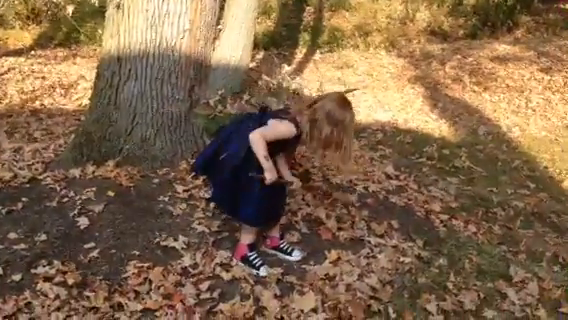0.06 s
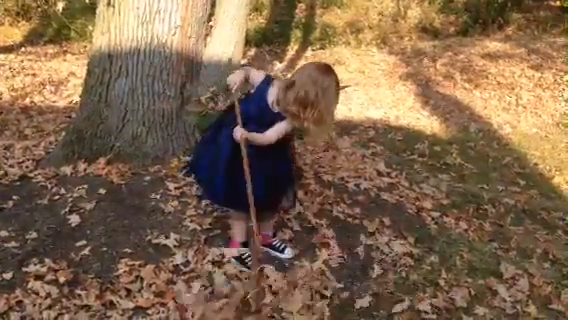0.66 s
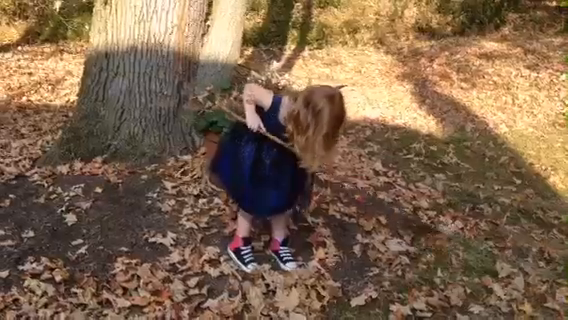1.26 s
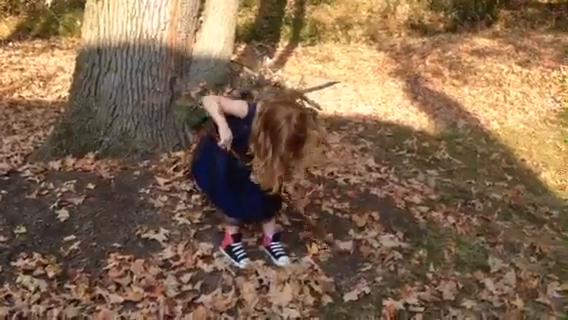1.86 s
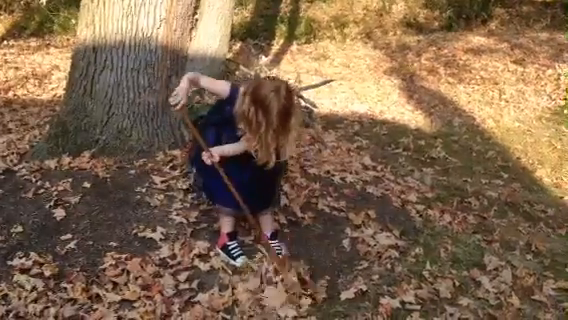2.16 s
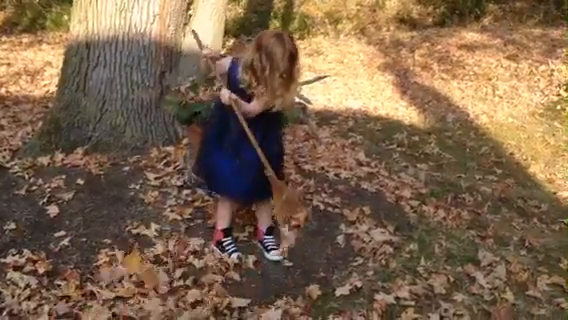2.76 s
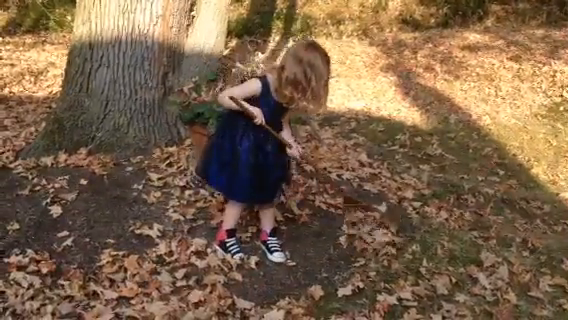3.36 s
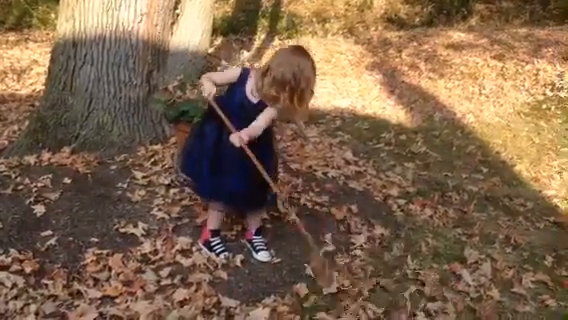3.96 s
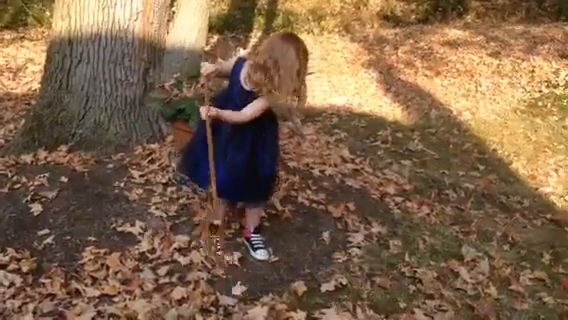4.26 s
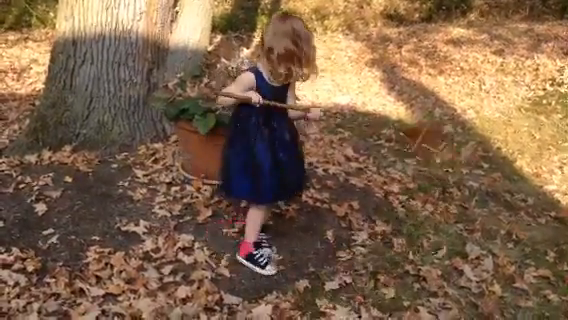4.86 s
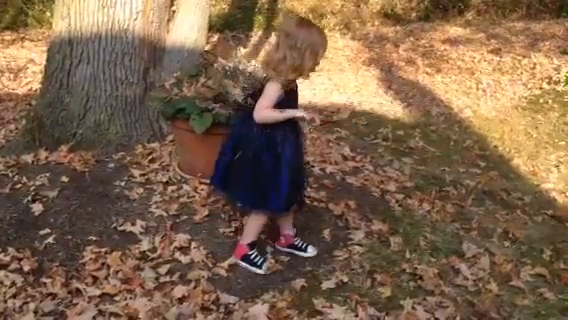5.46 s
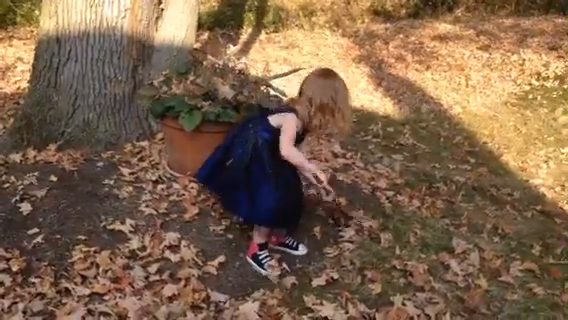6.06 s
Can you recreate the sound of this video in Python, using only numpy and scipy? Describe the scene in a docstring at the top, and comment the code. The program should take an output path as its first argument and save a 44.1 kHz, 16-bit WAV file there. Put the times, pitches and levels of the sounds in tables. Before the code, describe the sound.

In a quiet garden, a small rake is dragged through dry fallen leaves close to the microphone. Three long pulls each begin as a gritty scrape of tines and loosen into a crackling rustle. Twigs snap sharply along the way. The strokes then shrink to short scuffs and flicks, with a few soft knocks and one last rustle. A distant machine hums faintly under light outdoor noise and insects.

```python
"""In a garden, a child drags a small rake through dry leaves: three long pulls, then short scuffs.
Stick-slip friction excites the resonances of the digging tines; as the rake swings round and skims
on, the scrape gives way to loose leaves, whose many tiny fractures merge into a crackle.
Twigs snap, and shoes, rake head and handle knock, each an impulse with a damped ring.
A distant garden machine hums in wavering partials over faint outdoor noise and insects."""
import sys
import numpy as np
from scipy import signal
from scipy.fft import rfft, irfft
from scipy.io import wavfile
from scipy.ndimage import uniform_filter1d, map_coordinates

SR = 44100
rng = np.random.default_rng(int(sys.argv[2]) if len(sys.argv) > 2 else 0)


def put_to_file(sound):
    """Save the sound as 16-bit audio at rate SR, in the file named by the first command-line argument."""
    columns = np.atleast_2d(sound).T  # one column per channel
    safe = np.clip(columns, -1, 1)
    whole_steps = np.round(safe * 32767)
    wavfile.write(sys.argv[1], SR, whole_steps.astype(np.int16))


N = 269010


def undb(db):
    """Decibels to amplitude ratio."""
    return 10 ** (np.asarray(db) / 20)


def unit(x):
    """Normalisation to rms 1."""
    return x / np.sqrt(np.mean(x ** 2))


def walk(per_s):
    """Slow random modulation: random steps, smoothed twice, at rms 1."""
    hold = max(int(SR / per_s), 2)
    steps = np.repeat(rng.standard_normal(N // hold + 1), hold)
    return unit(uniform_filter1d(uniform_filter1d(steps, hold), hold)[:N])


def ring(x, hz, width_hz):
    """Second-order resonance with gain 1 at its centre."""
    return signal.lfilter(*signal.iirpeak(min(hz, SR / 2 - 1000), hz / width_hz, fs=SR), x)


def band(x, lo_hz, hi_hz, order):
    """Band-pass filtering."""
    return signal.sosfilt(signal.butter(order, [lo_hz, hi_hz], "band", fs=SR, output="sos"), x)


def colour(x, spectrum, size=4096):
    """Minimum-phase filtering to a given spectrum, so that clicks keep their sharp front."""
    hz, db = np.transpose(spectrum)
    gain = undb(np.interp(np.log(np.fft.rfftfreq(size, 1 / SR) + 1), np.log(hz), db))
    cepstrum = irfft(np.log(gain))
    cepstrum[1:size // 2] *= 2
    cepstrum[size // 2 + 1:] = 0
    return signal.fftconvolve(x, irfft(np.exp(rfft(cepstrum))))[:N]


# Spectrum of the outdoor background: frequency_hz, gain_db
AIR_SPECTRUM = [(30, -15), (72, -31), (95, -7.5), (150, -2), (260, 0.5), (420, -5.5), (900, -8),
                (1500, -12), (2700, -19.5), (4600, -16), (5800, -31.5), (8000, -37), (9300, -41),
                (15000, -31)]

def outdoor_air():
    """Broadband noise, strongest in the bass, with slight amplitude modulation."""
    return unit(colour(rng.standard_normal(N), AIR_SPECTRUM)) * undb(-55.5 + 0.69 * walk(5.1))


def insects():
    """Narrow-band noise: a far chorus, and one nearer insect modulated into about 14 chirps a second."""
    chorus = unit(ring(ring(rng.standard_normal(N), 7360, 900), 7360, 900)) * undb(-66 + walk(16))
    chirp_phase = 2 * np.pi * np.cumsum(14 * (1 + 0.21 * walk(8.4))) / SR
    chirps = np.maximum(np.sin(chirp_phase), 0) * undb(2 * walk(11))
    carrier = ring(ring(rng.standard_normal(N), 7450, 260), 7450, 260)
    return chorus + unit(carrier * chirps) * undb(-71)


# Partials of the motor, before the swell: pitch_hz, level_db, waver_fraction
MOTOR_PARTIALS = [(92, -77, 0.0083), (107.2, -72, 0.0056), (121, -76, 0.0036), (134, -66.5, 0.01),
                  (155.6, -76, 0.0137), (183.6, -55, 0.004), (214.5, -69, 0.0116), (277.4, -72.5, 0.01494),
                  (982, -72.5, 0.00796)]
# Swell of the whole hum: time_s, gain_db
MOTOR_SWELL = [(0, 0), (.5, -5), (1.4, -.5), (2.1, -1.5), (2.4, 2.5), (3.3, 1.5), (4.6, -1), (6.1, -3)]

def machine():
    """Superposition of a far motor's partials, which waver in pitch and fade in and out on the way."""
    hum = np.zeros(N)
    for pitch_hz, level_db, waver in MOTOR_PARTIALS:
        amplitude = np.sqrt(2) * undb(level_db + 0.5 * walk(4.9))
        phase = 2 * np.pi * np.cumsum(pitch_hz * (1 + waver * walk(10))) / SR
        hum += amplitude * np.sin(phase)
    return hum * undb(np.interp(np.arange(N) / SR, *np.transpose(MOTOR_SWELL)))


def crackle(per_s, spread_db, colour_db, scatter_db, scatter_s, bands=12):
    """Shot noise of breaking leaf edges: each click has its own colour and scatters through the litter."""
    strength = undb(spread_db * np.minimum(rng.exponential(size=N), 5.5))
    clicks = (rng.random(N) < per_s / SR) * strength * rng.choice([-1, 1], N)
    edges_hz = np.linspace(0, 1, bands + 1) ** 1.5 * 16000 + 150
    grains = np.zeros(N)
    for k in range(bands):
        weighted = clicks * undb(colour_db * rng.uniform(-0.69, 1, N))
        grains += band(weighted, edges_hz[k], edges_hz[k + 1], order=2) * (-1) ** k
    grains = unit(grains)
    energy = signal.lfilter([1], [1, -np.exp(-1 / (scatter_s * SR))], grains ** 2)
    scatter = unit(np.sqrt(energy) * rng.standard_normal(N))
    return unit(grains + undb(scatter_db) * scatter)


# Spectrum of contact with the ground, for shoes and tines alike: frequency_hz, gain_db
GROUND_SPECTRUM = [(150, -10), (450, -13), (720, -3.5), (1050, -12.5), (1450, -8.5), (2450, -4.5),
                   (2850, -6.5), (3400, -17), (3750, -5), (6200, -0.5), (7700, -11), (9400, -12),
                   (12300, -16.5), (14600, -15)]

def underfoot():
    """Sparse shot noise: leaves tick faintly under the shoes."""
    ticks = crackle(per_s=140, spread_db=2.5, colour_db=4, scatter_db=2, scatter_s=0.01, bands=5)
    return unit(colour(ticks, GROUND_SPECTRUM)) * undb(-71)


# Resonances of the tines: pitch_hz, width_hz, gain_db
TINE_MODES = [(3720, 270, 7), (4320, 150, 0.5), (4600, 140, -3), (4795, 71, -1)]

def tine_scrape():
    """Stick-slip friction drives resonances; each tine grips and lets go in its own time."""
    grit = crackle(per_s=4500, spread_db=2, colour_db=9.5, scatter_db=-3.5, scatter_s=0.0046)
    grit = colour(grit, GROUND_SPECTRUM)
    return grit + sum(undb(db + 3.1 * walk(35)) * ring(grit, hz, width) for hz, width, db in TINE_MODES)


# Spectrum of loose leaves: frequency_hz, gain_db
LEAF_SPECTRUM = [(150, -26), (500, -17), (800, -5.5), (1250, -11.5), (1900, 0.5), (2800, -1), (3900, -4.5),
                 (4750, -2.5), (5400, -8.5), (6700, 2), (8300, -6.5), (10200, -14), (11900, -14),
                 (14500, -14.5)]

def loose_leaves():
    """Dense shot noise of stirred leaves, with one resonance in the treble."""
    grains = crackle(per_s=3000, spread_db=3, colour_db=10.5, scatter_db=1, scatter_s=0.015)
    leaves = colour(grains, LEAF_SPECTRUM)
    return leaves + undb(-1) * ring(leaves, hz=4710, width_hz=200)


def stray_leaves(rustle_gain, relative_db=-18.5, lag_s=0.071):
    """Relaxation: single leaves crack in the wake of the rake, their level lagging the rustle."""
    cracks = crackle(per_s=130, spread_db=3.5, colour_db=7, scatter_db=-5, scatter_s=0.0034, bands=5)
    pole = np.exp(-1 / (lag_s * SR))
    wake = signal.lfilter([1 - pole], [1, -pole], rustle_gain)
    return unit(colour(cracks, LEAF_SPECTRUM)) * undb(relative_db) * wake


def contact_envelope(start_s, rise_s, hold_s, fade_db_per_s, settle_db=-15, settle_db_per_s=55):
    """Double-slope decay: after a rise and a hold the rustle fades, then the last leaves settle slowly."""
    t = np.arange(N) / SR - start_s
    rise = np.clip(t / rise_s, 0, 1) ** 1.17
    after_s = np.maximum(t - rise_s - hold_s, 0)
    return rise * undb(np.maximum(-fade_db_per_s * after_s, settle_db - settle_db_per_s * after_s))


# In these four tables level_db sets the rustle's middle band; body_db is its low band relative to that.
# The rake is set down: start_s, rise_s, hold_s, level_db, body_db
RAKE_LANDINGS = [(0.149, 0.029, 0.01, -35.5, -5), (1.683, 0.0074, .04, -41, -5.5),
                 (3.64, 0.067, 0.011, -34, -8.5), (4.547, 0.038, 0.0098, -40.5, -6.5),
                 (5.851, 0.037, 0.0062, -50.5, -5), (5.984, 0.1, .025, -40.5, -6.5)]
# Long pulls with the tines digging: start_s, rise_s, hold_s, level_db, body_db
RAKE_PULLS = [(0.206, 0.12, 0.18, -34.5, -6.5), (1.889, 0.23, .28, -37, -6), (3.688, 0.1, 0.061, -36.5, -9)]
# The rake skims and shoves loose leaves along: start_s, rise_s, hold_s, level_db, body_db
RAKE_SKIMS = [(.63, 0.083, 0.12, -45, -5.5), (.86, .08, 0.15, -43, -3), (2.56, 0.037, 0.14, -43, -4),
              (2.8, 0.063, 0.26, -48.5, -5), (4.0, 0.072, 0.19, -54.5, -6.5), (4.7, 0.053, 0.1, -58, -10),
              (5.8, 0.076, 0.11, -61, -10)]
# Tufts of leaves catch and flip: start_s, level_db
TUFT_FLICKS = [(1.085, -42), (1.21, -47.5), (1.355, -57.5), (1.805, -49), (2.69, -51), (3.105, -49.5),
               (3.203, -46.5), (3.3, -58), (3.397, -59), (4.163, -49), (4.265, -51.5), (4.42, -58.5),
               (4.52, -51.5), (4.62, -48.5), (4.865, -53.5)]

def stirring(flick_rise_s=0.01, flick_hold_s=0.0067, flick_body_db=-5.5):
    """Incoherent sources add in power: all contacts sum to the gains of the rustle's body and middle."""
    flicks = [(s, flick_rise_s, flick_hold_s, db, flick_body_db) for s, db in TUFT_FLICKS]
    body_power, middle_power = np.zeros((2, N))
    for table, fade_db_per_s in (RAKE_LANDINGS, 198), (RAKE_PULLS, 69.5), (RAKE_SKIMS, 67), (flicks, 209):
        for start_s, rise_s, hold_s, level_db, body_db in table:
            power = (undb(level_db) * contact_envelope(start_s, rise_s, hold_s, fade_db_per_s)) ** 2
            middle_power += power
            body_power += power * undb(body_db) ** 2
    return np.sqrt(body_power), np.sqrt(middle_power)


# The swing that goes with each pull: duration_s
SWING_DURATIONS = [0.87, 0.92, 1.02]

def swing(ease=1.83):
    """Accelerating motion from 0, digging, to 1, swung round and skimming; the next landing resets it."""
    t, sweep = np.arange(N) / SR, np.zeros(N)
    for (start_s, *_), duration_s in zip(RAKE_PULLS, SWING_DURATIONS):
        next_landing_s = min(s for s, *_ in RAKE_LANDINGS if s > start_s)
        sweep += np.clip((t - start_s) / duration_s, 0, 1) ** ease * (t < next_landing_s)
    return uniform_filter1d(sweep, size=256).clip(0, 1)


def near_echo(x, sweep, reflection, dig_lag_s=0.0003252, skim_lag_s=0.00025):
    """Comb filtering by an inverted reflection: as its lag shrinks, the notches slide upward."""
    lag = (dig_lag_s + (skim_lag_s - dig_lag_s) * sweep) * SR
    return x - reflection * map_coordinates(x, [np.arange(N) - lag], order=5)


def balance(x, gains):
    """Complementary filters split body, middle and top; each is normalised and given its own gain."""
    hz, spectrum = np.fft.rfftfreq(N, 1 / SR), rfft(x)
    body = 1 / (1 + (hz / 3200) ** 16)
    below_top = 1 / (1 + (hz / 8200) ** 16)
    shares = body, below_top - body, 1 - below_top
    return sum(unit(irfft(spectrum * share, N)) * gain for share, gain in zip(shares, gains))


def rake(dig_top_db=-7.5, skim_top_db=-6):
    """Equal-power crossfade from scraping tines to loose leaves as the rake swings round and lifts."""
    body, middle = stirring()
    sweep = swing()
    top = middle * undb(dig_top_db + (skim_top_db - dig_top_db) * sweep)
    scrape = near_echo(tine_scrape(), sweep, reflection=0.48)
    leaves = near_echo(loose_leaves(), sweep, reflection=0.3)
    # both catch and slip unevenly, so their levels flutter
    scrape = balance(scrape, (body, middle, top)) * undb(0.7 * walk(80))
    leaves = balance(leaves, (body, middle, top)) * undb(1.7 * walk(80))
    leaf_share = 0.057 + 0.81 * sweep
    return np.sqrt(1 - leaf_share) * scrape + np.sqrt(leaf_share) * leaves + stray_leaves(middle)


def impacts(table, crack_db, crack_s, width_share, tail_db, tail_s, size=4096):
    """Impulsive excitation: a broad crack and a rough, damped ring with a crinkling tail."""
    out, t = np.zeros(N + size), np.arange(size) / SR
    for start_s, peak_db, pitch_hz, t60_s in table:
        ring_noise, crack_noise = rng.standard_normal((2, size))
        fade = np.exp(-np.log(1000) * t / t60_s) + undb(tail_db) * np.exp(-t / tail_s)
        # reversed, so that the resonance is at full strength from the start
        ringing = unit(ring(ring_noise, pitch_hz, pitch_hz * width_share)[::-1]) * fade
        top_hz = min(2 * pitch_hz + 1500, SR / 2 - 1000)
        crack = unit(band(crack_noise, pitch_hz / 4, top_hz, order=1)) * np.exp(-t / crack_s)
        hit = ringing + undb(crack_db) * crack
        start = int(start_s * SR)
        out[start:start + size] += undb(peak_db) * hit / np.abs(hit).max()
    return out[:N]


# Snapping twigs and flicking tines: start_s, peak_db, pitch_hz, t60_s
TWIG_SNAPS = [(.1815, -24, 4470, 0.011), (.4552, -15.5, 4430, 0.01), (.9485, -24.5, 4900, 0.011),
              (1.1095, -26.5, 6500, 0.015), (1.1478, -22, 4760, 0.011), (1.322, -37, 7000, .008),
              (1.712, -26, 3860, 0.021), (3.6865, -21, 4430, 0.019), (3.906, -21, 4600, 0.015),
              (3.972, -26.5, 4560, 0.011), (4.182, -29, 4870, 0.018), (4.215, -31.5, 4500, 0.023),
              (4.524, -35, 6640, 0.039), (4.547, -33.5, 4300, 0.016), (4.6725, -29, 11000, 0.0079),
              (4.869, -35.5, 6000, 0.041), (5.157, -40.5, 4460, 0.096), (5.451, -37, 4500, .016)]

def snaps():
    """Sudden release of elastic energy: a twig breaks or a tine springs free with a bright crack."""
    return impacts(TWIG_SNAPS, crack_db=-3, crack_s=0.0013, width_share=0.14, tail_db=-36, tail_s=0.013)


# Knocks of shoes, rake head and handle: start_s, peak_db, pitch_hz, t60_s
DULL_KNOCKS = [(2.8806, -24.5, 1920, 0.019), (4.918, -43.5, 1410, 0.053), (4.938, -43.5, 700, 0.05),
               (5.088, -47, 780, .043)]

def knocks():
    """Damped vibration after a blunt impact: a softer crack and a lower ring."""
    return impacts(DULL_KNOCKS, crack_db=-10.5, crack_s=0.0061, width_share=0.16,
                   tail_db=-17, tail_s=0.022)


def scene():
    """Superposition in one channel: the rake close by, the garden behind it."""
    return (snaps() + knocks() + rake() + underfoot() + machine() + outdoor_air() + insects())[None]


def record(dry, bass_hz=62, top_hz=15400):
    """Band limiting: the small microphone loses the deep bass, and the recorder cuts the top."""
    thin = signal.sosfilt(signal.butter(3, bass_hz, "high", fs=SR, output="sos"), dry)
    return signal.sosfilt(signal.ellip(10, 0.2, 75, top_hz, fs=SR, output="sos"), thin)


dry = scene()
out = record(dry)
put_to_file(out)
```